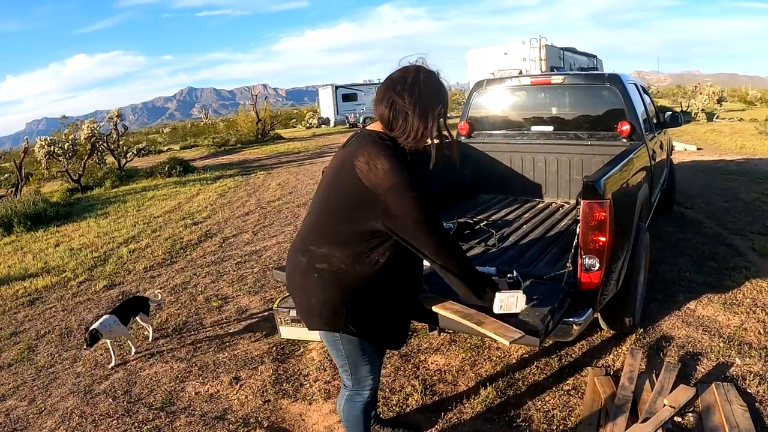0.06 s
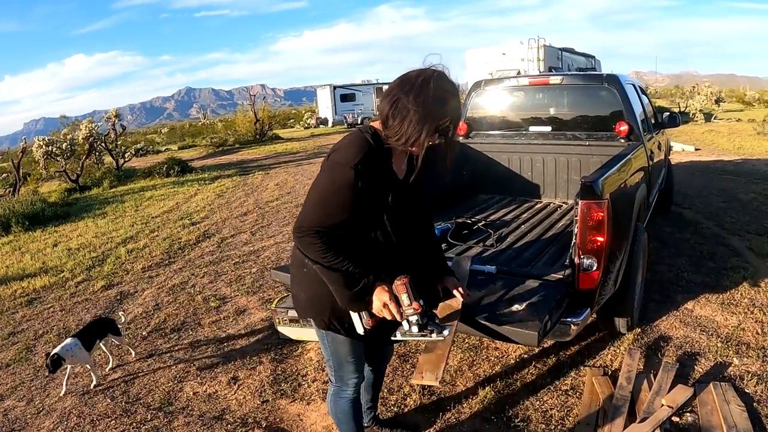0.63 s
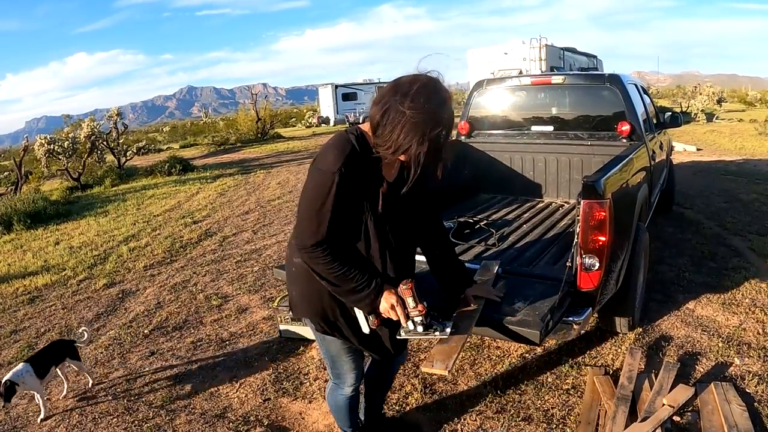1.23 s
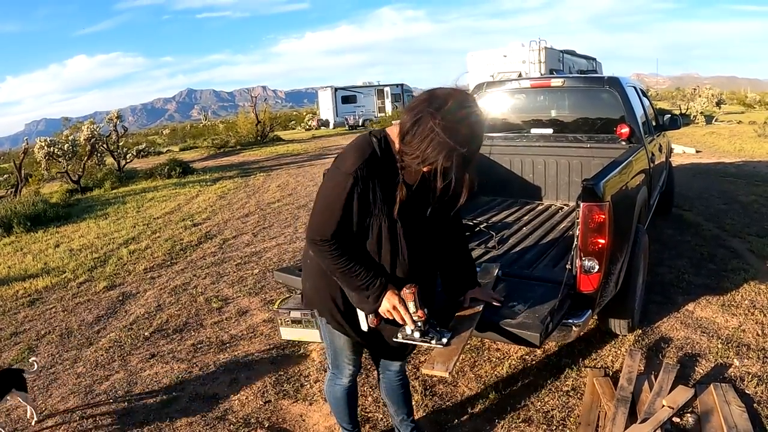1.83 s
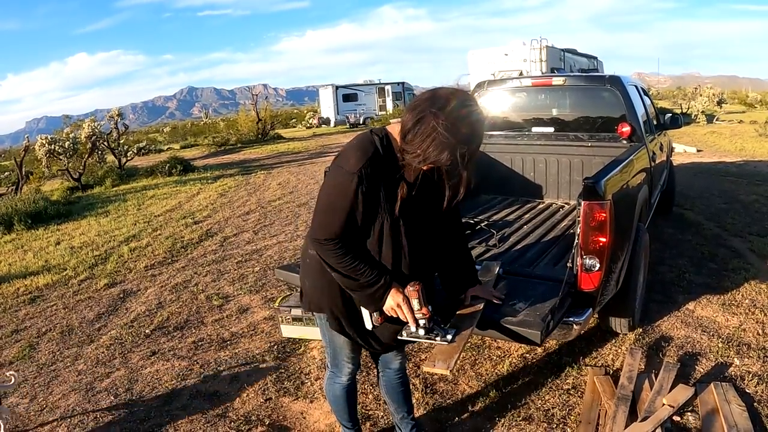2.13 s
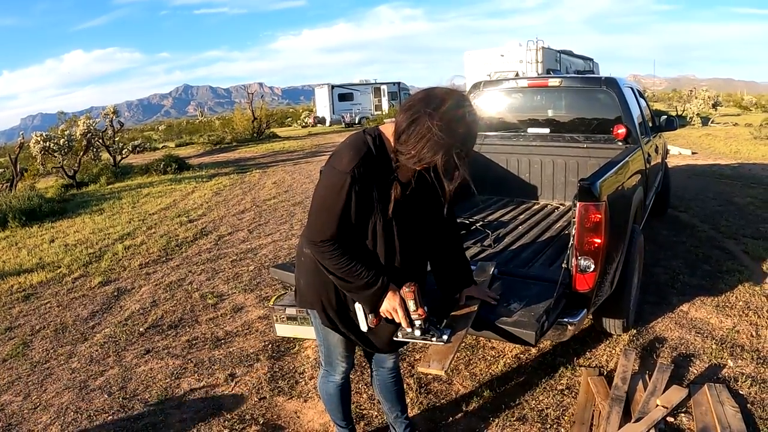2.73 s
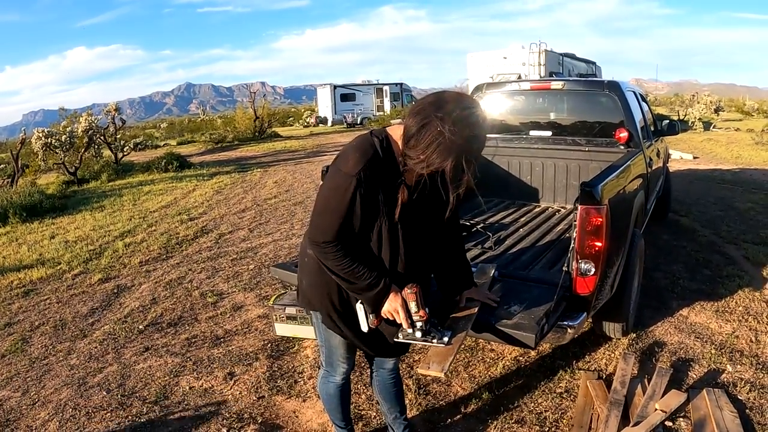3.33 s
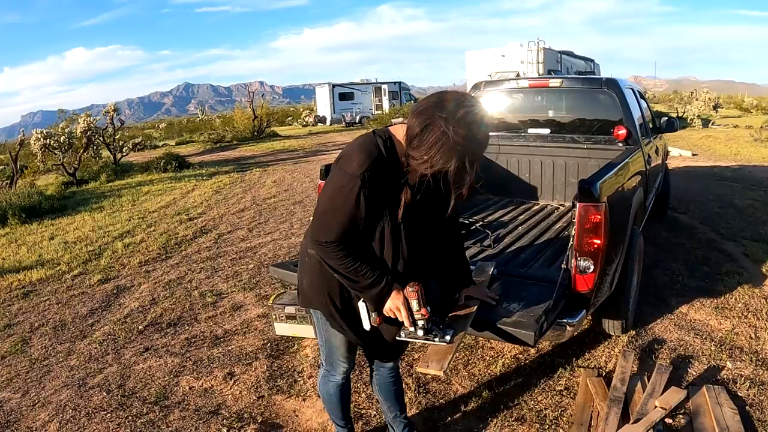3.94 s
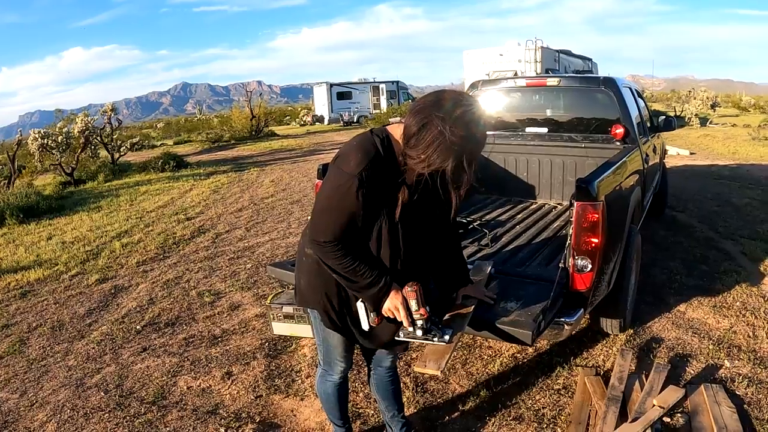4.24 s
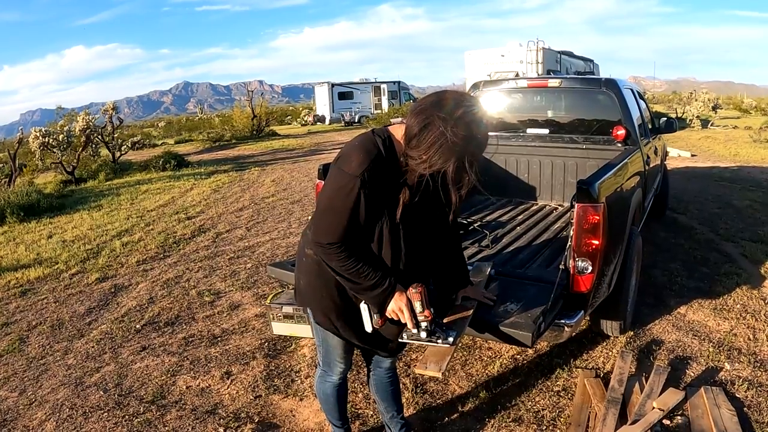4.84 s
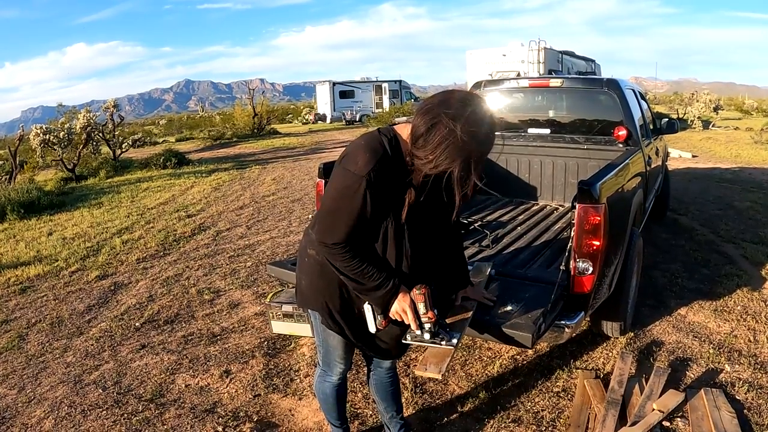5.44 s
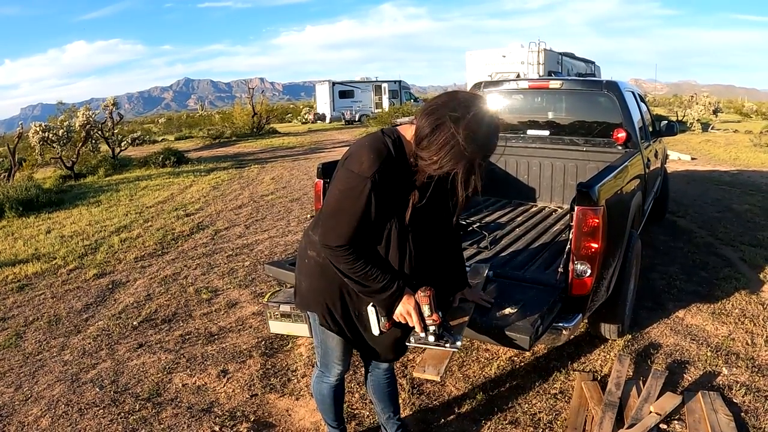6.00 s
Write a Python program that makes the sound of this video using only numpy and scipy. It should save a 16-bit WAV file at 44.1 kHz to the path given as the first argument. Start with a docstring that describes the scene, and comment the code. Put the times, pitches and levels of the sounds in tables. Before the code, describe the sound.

Over a faint low rush of outdoor air, a power saw is dragged off a pickup bed with light ticks, a dull scrape and soft bumps. From about 0.7 to 1.2 seconds the saw and a wooden board knock on the tailgate, with rustling and a brief ring from the steel blade. Another knock comes at 1.5 seconds, then a few small snaps and a lull. At about 3.1 seconds the trigger clicks and the reciprocating saw runs up over half a second, humming, with rattling gears and a few clacks. At about 4.1 seconds the blade bites into the board with short high squeaks. The motor gradually drops in pitch while a rapid, pulsing rasp and the board's low drone grow. The pinched blade squeals most around 5 to 5.3 seconds, and the cutting is still going at the end, about 6 seconds in.

```python
"""First come ticks, rustling and soft bumps as a power saw is dragged off a pickup's bed outdoors.
The saw and a wooden board knock on the tailgate, and the jarred steel blade rings.
The trigger clicks, the motor runs up with rattling gears, and the blade bites into the board.
Under load the motor slows, the drive knocks with every stroke, the teeth rasp through the wood,
the blade squeals where the cut pinches it, and the shaken board drones."""
import sys
import numpy as np
from scipy.fft import rfft, irfft, next_fast_len
from scipy.io import wavfile
from scipy.ndimage import uniform_filter1d, minimum_filter1d, map_coordinates

SR = 44100
rng = np.random.default_rng(int(sys.argv[2]) if len(sys.argv) > 2 else 0)


def store_pcm(level_fs):
    """Save levels as 16-bit WAV."""
    pcm = np.round(np.clip(level_fs, -1, 1) * 32767).astype(np.int16)
    wavfile.write(sys.argv[1], SR, np.atleast_2d(pcm).T)


N = 267687
TIME = np.arange(N) / SR

# Levels are relative. A mode is a pitch at which a thing rings; ring_s is its time to fade by 60 dB.
# Rush of open air: pitch_hz, level_db
AIR_SPECTRUM = [(20, -36), (30, -37), (48, -22), (66, -9.5), (80, -7.5), (100, -4.5), (155, -0.5),
                (200, -1), (256, 1), (340, -9), (420, -14), (665, -13), (1110, -6), (1850, -15.5),
                (3300, -36.5), (7000, -52), (12000, -87)]
# Sleeves and the saw's shoe (its metal foot) brush the board: start_s, length_s, level_db
BRUSHES = [(0, 0.0073, -34.5), (0.14, 0.55, -53.5), (0.76, 0.4, -31.5), (1.36, 0.18, -53.5),
           (1.637, 0.064, -43), (1.745, 0.25, -49), (2.85, 0.073, -52.5)]
# Rustle of that brushing: pitch_hz, level_db
RUSTLE_SPECTRUM = [(40, -13), (200, 3), (600, -2), (1200, -13), (2100, 0), (3000, -10), (3900, -6.5),
                   (6000, -21), (8900, -39), (11000, -28), (13000, -62)]
# Dull scrape on the truck bed's liner: pitch_hz, level_db
LINER_SPECTRUM = [(100, -16), (220, 0), (450, -15), (1200, 2), (1900, -3), (3000, -21), (8000, -56)]
# The teeth skid over metal: middle_s, length_s, level_db
SKIDS = [(0.838, 0.065, -37), (0.89, .06, -45), (1.05, .09, -46)]
# Bright sizzle of a skid: pitch_hz, level_db
SKID_SPECTRUM = [(3000, -40), (6300, 7), (8000, -14), (9600, -2), (12500, 0), (13500, -11)]
# Loose parts of the saw tick: start_s, level_db, pitch_hz
TICKS = [(.024, -24, 2060), (.062, -39, 2130), (.182, -26, 2080), (.223, -33, 2040), (.226, -49, 3830),
         (.342, -25, 2060), (.358, -35, 1550), (.479, -25, 1870), (.502, -23.5, 2090), (.545, -26, 2000),
         (.617, -32, 2000)]
# Grit under the shoe snaps, and the trigger clicks: start_s, level_db
SNAPS = [(1.229, -33.5), (1.241, -35), (1.528, -38), (1.659, -29), (1.745, -35), (1.868, -37), (2.863, -42),
         (2.919, -44), (3.082, -25)]
# Dry noise of a snap: pitch_hz, level_db
SNAP_SPECTRUM = [(500, -25), (2000, 8), (4200, 9), (7000, -12.5), (11000, -24), (13000, -28)]
# The hand-held board lands: start_s, level_db, pitch_hz
THUDS = [(.701, -10.5, 241.6), (0.735, -13, 175), (0.82, -16.5, 296), (1.025, -19.5, 302),
         (1.496, -23, 200.4)]
# Board and saw knock on the tailgate; the last knock is the trigger's click:
# start_s, level_db, rise_s, boom_db, brightness_db_per_octave
KNOCKS = [(0.68, -18, 0.00059, -9, 2.5), (0.696, -8, 0.00042, -16, 0), (0.702, -16, 0.0019, -6.5, 0),
          (.816, -11, 0.0043, -9.5, 12), (.857, -27, .0005, -5, 9), (.875, -13, 0.0011, -7, 2),
          (0.914, -26, 0.0041, 3, 25), (0.945, -9, 0.0048, -28, -6), (.957, -11.5, 0.0013, -9, -5),
          (1.018, -5.5, 0.011, -15.5, 3), (1.078, -19.5, 0.00052, -28, 0.5),
          (1.165, -21, 0.0032, -9.5, -19), (1.184, -19.5, 0.0087, -29, 7.5), (1.483, -15, 0.00041, -6, -2),
          (1.663, -29.5, 0.00035, -24, 2), (1.787, -30, 0.0042, -19, 0), (2.698, -44, 0.00036, -17, 7),
          (3.078, -21.5, 0.00074, -8.5, 3)]
# Dry clack of a knock: pitch_hz, level_db
KNOCK_SPECTRUM = [(180, -51), (300, -13), (692, -16), (1280, -7.5), (1430, 0.5), (1780, -8), (1990, 1),
                  (2640, -12), (4240, -20), (7730, -39.5), (9190, -67), (11100, -40), (13000, -58)]
# Boom of board and tailgate: pitch_hz, level_db, ring_s
TAILGATE_MODES = [(154, -0.5, 0.33), (196.5, 0.5, 0.39), (245, -3.5, 0.57), (301.3, 4, 0.27),
                  (330.4, 2.5, 0.24), (398, -6, 0.28), (557, -3.5, 0.32), (747, -6, 0.3), (954, -0.5, 0.22),
                  (1000, 7, 0.18), (1256, 1, 0.2), (1540, -9, 0.073), (1870, 8.5, 0.093)]
# The free steel blade: pitch_hz, level_db, ring_s
BLADE_MODES = [(1580, -9, 0.4), (1825, 1, 0.95), (2089, -4, 0.7), (2234, -3, .5), (2500, -1, 0.68),
               (2870, -2, 0.3), (3295, -8, 0.18), (3898, -9, .6), (4130, 2, 0.16), (5175, -7, 0.38),
               (6030, -16, .6), (6275, -4, 0.42), (6551, -12, .6), (7084, -18, 0.73), (7477, -11, 0.6),
               (8274, -25, 0.9), (9550, -10, 0.35), (10070, -15, 0.65), (10890, -10, 0.42),
               (11460, -8, 0.35), (11950, -14, 0.3), (12540, -10, 0.35), (13108, -14, 0.45)]
# The blade is jarred: start_s, level_db, boosted_pitch_hz, boost_db, share_of_ring_time, rise_s
BLADE_JARS = [(0, -42, 6030, 17, 0.4, 0.00067), (0.701, -43, 2130, 19, 0.76, 0.0014),
              (0.765, -35, 3295, 22, 0.62, 0.014), (0.787, -33, 5179, 3, 0.83, 0.0055),
              (.817, -30.5, 11200, 16, 1, 0.0012), (.875, -30.5, 1825, 9.5, 1, 0.0012),
              (0.968, -38, 5179, 20, 0.7, 0.0008), (0.974, -37, 7477, 14, 1, 0.0011),
              (1.021, -36, 6400, 9.5, 0.8, 0.0011)]
# Where the blade's ring sits in stereo: pitch_hz, left_minus_right_db
BLADE_PAN = [(7000, 0), (9500, 0.5), (12000, -6)]
# The saw's housing: pitch_hz, width_hz, level_db
HOUSING_MODES = [(791, 10.6, -8.5), (1326, 104, -20.5), (1652, 31, -2), (1976, 46, 5.5), (2195, 43, -10),
                 (2820, 30, -21)]
# The board or a jolt of the drive knocks the housing: start_s, level_db, boosted_pitch_hz
HOUSING_JOLTS = [(.68, -20, 1990), (1.483, -12, 2000), (1.487, -11.5, 1600), (3.081, -22, 1960),
                 (3.271, -11, 1640), (3.317, -12, 1990), (3.554, -10, 1633), (3.583, -17, 1950),
                 (4.174, -9, 1960), (4.307, -8, 1960), (4.371, -18, 1640), (4.532, -5.5, 2000),
                 (5.334, -7, 1950), (5.386, -8, 1970)]
# Resonances that boost the tone at three times the motor's speed: pitch_hz, width_hz, boost_db
THIRD_HARMONIC_PEAKS = [(936, 36, 14), (890, 13, 12)]
# Rattle of the gears: pitch_hz, level_db
GEAR_SPECTRUM = [(60, -29), (170, -18), (310, -4.5), (470, -16.5), (560, -6.5), (1000, -5.5), (1220, 2),
                 (2200, 3), (3150, -5), (4100, 0.5), (5250, -14), (5950, -11.5), (7350, -20), (8870, -49),
                 (11100, -19.5), (13400, -68)]
# The board shaken by the teeth: pitch_hz, width_hz, level_db
BOARD_MODES = [(195, 3.3, -2.5), (298.5, 13, 4)]
# The blade held in the cut: pitch_hz, width_hz, level_db
HELD_BLADE_MODES = [(3000, 93, 4), (5270, 90, -2), (6530, 130, -8)]
# The blade pinched by the cut: pitch_hz, width_hz, level_db
PINCHED_BLADE_MODES = [(2805, 140, 2), (4520, 230, 4.5), (5460, 190, 0), (6850, 250, -1)]
# The blade sticks and squeals: middle_s, length_s, pitch_hz, level_db
SQUEALS = [(4.135, .03, 3720, -20), (4.203, 0.022, 3590, -12.5), (4.228, .018, 6640, -27),
           (4.248, .01, 3720, -15), (4.357, .018, 3770, -16), (4.449, .018, 3710, -15),
           (4.517, .02, 3750, -16.5), (4.97, .14, 3870, -19), (5.04, .22, 2850, -27),
           (5.06, 0.13, 3730, -17.5), (5.05, 0.05, 4580, -24), (5.15, .28, 4540, -30),
           (5.213, 0.04, 3630, -13), (5.208, 0.046, 4590, -18.5), (5.268, 0.07, 4500, -20),
           (5.462, 0.03, 4420, -21), (5.828, .02, 3950, -17), (6.02, 0.04, 3944, -15)]
# Teeth tearing wood: pitch_hz, level_db
RASP_SPECTRUM = [(60, -60), (200, -43), (500, -40), (750, -14), (1500, -56), (2400, 0.5), (3200, -9.5),
                 (3900, 7), (4500, -4.5), (5050, -8.5), (5700, -14.5), (6900, -13.5), (8000, -30),
                 (9500, -29.5), (10900, -10), (12800, -22), (14000, -11)]
# How hard the blade is pressed into the board: time_s, load_0_to_1
LOAD = [(4.1, 0), (4.3, .12), (4.5, .27), (4.65, .5), (4.85, .7), (5.1, .78), (5.32, .9), (6.07, 1)]
# Echoes from board, tailgate and ground: delay_s, gain
ECHOES = [(.00109, 0.12), (.0030, 0.0064), (.00435, .14), (.0068, 0.11)]
# Stereo width of the saw: pitch_hz, side_db
SAW_WIDTH = [(80, -16), (300, -40), (650, -30.5), (2000, -60.5), (4000, -46.5), (7000, -31), (11000, -11)]
# Stereo width of the handling and the open air: pitch_hz, side_db
BACKGROUND_WIDTH = [(2500, -71), (4000, -39), (7000, -29), (11000, -8)]
# The microphone's treble response: pitch_hz, gain_db
MICROPHONE = [(8000, 0), (8750, -3), (9020, -14), (9250, -7), (10000, -2.5), (13000, -11.5), (13500, -18)]

TRIGGER_S, RUN_UP_S = 3.08, 0.55
FREE_HZ, SAG_HZ = 384, 96  # motor turns a second: running free, and lost at full load
GEAR_RATIO = 8.1  # motor turns for one back-and-forth cycle of the blade
BITE_S, BITE_RISE_S = 4.077, 0.064  # the teeth enter the wood
PINCH_S = 5.2  # the cut grips the blade hardest
STROKE_DB = 4  # how far the blade's song and squeals pulse with each cycle


def amp(db):
    """Turn decibels into a gain."""
    return 10 ** (np.asarray(db) / 20)


def unit(x):
    """Scale a signal to an average (rms) level of 1."""
    return x / np.sqrt(np.mean(x ** 2) + 1e-20)


def along(points, hz):
    """Read between (pitch, value) points on a log pitch axis."""
    pitches, values = np.transpose(points)
    return np.interp(np.log(hz + 1), np.log(pitches + 1), values)


def ramp(start_s, length_s):
    """Rise evenly from 0 to 1."""
    return np.clip((TIME - start_s) / length_s, 0, 1)


def bell(x, centre, width):
    """A smooth hump of height 1."""
    return np.exp(-(2 * (x - centre) / width) ** 2)


def wobble(per_s):
    """A smooth curve through per_s random values a second."""
    return map_coordinates(rng.standard_normal(int(N * per_s / SR) + 4), [TIME * per_s])


def grains(per_s, spread_db):
    """Tiny random impacts of uneven size."""
    size = amp(spread_db * np.clip(rng.standard_normal(N), -2, 2))
    return unit((rng.random(N) < per_s / SR) * rng.uniform(-0.64, 1, N) * size)


def filtered(x, response):
    """Give each frequency in x the gain that response returns for it."""
    size = x.shape[-1]
    padded = next_fast_len(size + SR // 4)
    return irfft(rfft(x, padded) * response(np.fft.rfftfreq(padded, 1 / SR)), padded)[..., :size]


def coloured(x, spectrum):
    """Shape x with a spectrum table, then scale it to level 1."""
    return unit(filtered(x, lambda hz: amp(along(spectrum, hz))))


def resonate(x, modes):
    """Let x shake (pitch, width, level) modes, then scale it to level 1."""
    def response(f):
        return sum(amp(db) * 1j * f * width / (hz * hz - f * f + 1j * f * width)
                   for hz, width, db in modes)
    return unit(filtered(x, response))


def phase_of(hz):
    """The running angle of a changing frequency."""
    return 2 * np.pi * np.cumsum(hz) / SR


def fuzzy_tone(hz, width_hz):
    """A mode kept ringing by random pushes: its strength and phase drift."""
    angle = phase_of(hz)
    return unit(wobble(width_hz) * np.sin(angle) + wobble(width_hz) * np.cos(angle))


def ring(modes, t):
    """Fading modes, struck at slightly new strengths each time."""
    hz, db, ring_s = np.transpose(modes)[:, :, None]
    fade = amp(db + 2 * rng.standard_normal(hz.shape) - 60 * t / ring_s)
    return np.sum(fade * np.sin(2 * np.pi * (hz * t + rng.random(hz.shape))), axis=0)


def boosted(modes, centre_hz, boost_db, reach_octaves=0.041):
    """The spot that is hit wakes the modes near one pitch most."""
    return [(hz, db + boost_db * np.exp(-(np.log2(hz / centre_hz) / reach_octaves) ** 2), ring_s)
            for hz, db, ring_s in modes]


def add(track, start_s, sound):
    """Mix a sound into the track."""
    part = track[max(round(start_s * SR), 0):][:len(sound)]
    part += sound[:len(part)]


def reflected(x):
    """Nearby surfaces add weak, delayed copies."""
    return filtered(x, lambda hz: 1 + sum(gain * np.exp(-2j * np.pi * hz * s) for s, gain in ECHOES))


def spread(mid, width):
    """Stereo for a source straight ahead: a weak scattered part differs between left and right."""
    side = filtered(mid * wobble(160), lambda hz: amp(along(width, hz)))
    return np.array([mid + side, mid - side])


def open_air():
    """A low outdoor rush that sways very slightly."""
    return amp(-36.5 + 0.6 * wobble(7)) * coloured(rng.standard_normal(N), AIR_SPECTRUM)


def brushing(rise_s=0.0038, fade_db_per_s=195):
    """Sleeves and the saw's shoe rub the board: each stroke rises, holds and fades."""
    strokes = sum(ramp(s, rise_s) * amp(db - fade_db_per_s * np.maximum(TIME - s - length_s, 0))
                  for s, length_s, db in BRUSHES)
    friction = rng.standard_normal(N) + 0.3 * grains(per_s=160, spread_db=2.5)
    return strokes * coloured(friction, RUSTLE_SPECTRUM)


def scrapes():
    """The saw slides dully over the bed liner; its teeth skid brightly over metal."""
    slide = coloured(grains(per_s=1300, spread_db=3.5), LINER_SPECTRUM)
    sizzle = coloured(grains(per_s=3700, spread_db=5), SKID_SPECTRUM)
    skids = sum(amp(db) * bell(TIME, s, length_s) for s, length_s, db in SKIDS)
    return amp(-38) * bell(TIME, 0.48, 0.55) * slide + skids * sizzle


def ticks_and_snaps(tick_ring_s=0.035, tick_rise_s=0.0024, snap_ring_s=0.013):
    """Loose parts tick with one short note each; grit and the trigger snap dryly."""
    out, t = np.zeros(N), np.arange(SR // 10) / SR
    for s, db, hz in TICKS:
        noise = coloured(rng.standard_normal(len(t)), SNAP_SPECTRUM)
        note = np.sin(2 * np.pi * hz * t) + amp(-15) * noise
        add(out, s, amp(db - 60 * t / tick_ring_s) * (1 - np.exp(-t / tick_rise_s)) * note)
    for s, db in SNAPS:
        noise = coloured(rng.standard_normal(len(t)), SNAP_SPECTRUM)
        add(out, s, amp(db - 60 * t / snap_ring_s) * noise)
    return out


def board_thuds(rise_s=0.013, ring_s=0.19):
    """Grip and support change with each landing, so each thud has its own low pitch."""
    out, t = np.zeros(N), np.arange(SR // 4) / SR
    for s, db, hz in THUDS:
        add(out, s, amp(db - 60 * t / ring_s) * (1 - np.exp(-t / rise_s)) * np.sin(2 * np.pi * hz * t))
    return out


def drag_bumps(count=6, span_s=(0.17, 0.55), rise_s=0.024, boom_db=-5.5, brightness=-7):
    """The dragged saw bumps softly at loosely even times; gives rows like those of KNOCKS."""
    chance = rng.random((count, 2))
    times = np.interp((np.arange(count) + chance[:, 0]) / count, [0, 1], span_s)
    levels_db = -24.5 - 5 * (2 * chance[:, 1] - 1)
    return [(s, db, rise_s, boom_db, brightness) for s, db in zip(times, levels_db)]


def knocks(clack_ring_s=0.083, detune=0.075):
    """Each knock, and the trigger's click, is a dry clack and a boom that shifts as the weight moves."""
    out, t = np.zeros(N), np.arange(SR // 2) / SR
    for s, db, rise_s, boom_db, brightness in KNOCKS + drag_bumps():
        def colour(hz):
            octaves = np.clip(np.log2((hz + 1) / 2000), -1, 1.5)
            return amp(along(KNOCK_SPECTRUM, hz) + brightness * octaves)
        clack = unit(filtered(rng.standard_normal(len(t)), colour)) * amp(-60 * t / clack_ring_s)
        modes = [(hz * np.exp(detune * rng.standard_normal()), mode_db, ring_s)
                 for hz, mode_db, ring_s in TAILGATE_MODES]
        boom = amp(boom_db - 5.5) * ring(modes, t) * (1 - np.exp(-t / 0.019))
        add(out, s, amp(db) * (clack + boom) * (1 - np.exp(-t / rise_s)))
    return out


def blade_ring(flutter_per_s=110, settle_s=1.126, settle_db_per_s=252):
    """The jarred steel rings; it is loose in its clamp, so each mode flutters on its own."""
    out, t = np.zeros(N), np.arange(SR // 2) / SR
    for s, db, centre_hz, boost_db, share, rise_s in BLADE_JARS:
        for hz, mode_db, ring_s in boosted(BLADE_MODES, centre_hz, boost_db):
            flutter_db = 3 * np.interp(t * flutter_per_s, np.arange(len(t)), rng.standard_normal(len(t)))
            note = ring([(hz, mode_db, share * ring_s)], t)
            add(out, s, amp(db + flutter_db) * note * (1 - np.exp(-t / rise_s)))
    # the shoe settles on the board and stops the ring
    return out * amp(-settle_db_per_s * np.maximum(TIME - settle_s, 0))


def housing_clacks():
    """Single hard jolts ring the saw's housing."""
    out, t = np.zeros(N), np.arange(SR // 8) / SR
    # the narrower a mode, the longer it rings
    modes = [(hz, db, np.log(1000) / (np.pi * width)) for hz, width, db in HOUSING_MODES]
    for s, db, hz in HOUSING_JOLTS:
        clack = ring(boosted(modes, hz, boost_db=12), t) * (1 - np.exp(-t / 0.0024))
        add(out, s, amp(db - 3) * clack / np.abs(clack).max())
    return out


def speed_db(speed_hz, db_per_tenfold):
    """A slower motor is quieter: the level compared with running free."""
    return db_per_tenfold * np.log10(np.maximum(speed_hz / FREE_HZ, 0.1))


def motor_hum(shaft, speed_hz, load):
    """The rotor hums at its turning speed and at three times that, and runs rough as it speeds up."""
    growth_db = speed_db(speed_hz, db_per_tenfold=29)
    swell_db = 7 * bell(TIME, 3.95, 0.4)  # just before the teeth bite
    peaks_db = sum(db * bell(3 * speed_hz, hz, width) for hz, width, db in THIRD_HARMONIC_PEAKS)
    third = np.sin(3 * shaft + 0.25 * wobble(60))
    hum_db = -32.5 + growth_db - 11 * load + swell_db + 1.2 * wobble(35)
    hum = amp(hum_db) * np.sin(shaft + 0.14 * wobble(50))
    hum += amp(-43 + growth_db + peaks_db + 2.2 * wobble(30)) * third
    shudder = amp(-29) * bell(TIME, 3.48, 0.31) * fuzzy_tone(speed_hz, width_hz=61)
    return np.sqrt(2) * hum + shudder


def gear_rattle(shaft, speed_hz, load, wear_points=1100):
    """Gear teeth rattle in the housing, throbbing once a motor turn and juddering unevenly."""
    throb = amp(1.6 * np.sin(shaft) + wobble(80))
    hiss = rng.standard_normal(N)
    # uneven tooth faces: the same rough pattern comes round with every blade cycle
    position = shaft / GEAR_RATIO / (2 * np.pi) % 1
    wear = unit(np.interp(position, np.arange(wear_points) / wear_points,
                          rng.standard_normal(wear_points)))
    impacts = grains(per_s=2500, spread_db=3)
    rattle = coloured(throb * (hiss + 0.35 * wear + 0.74 * impacts), GEAR_SPECTRUM)
    housing = resonate(throb * grains(per_s=3000, spread_db=1.5), HOUSING_MODES)
    level_db = -16 + speed_db(speed_hz, db_per_tenfold=15) - 0.6 * load
    return amp(level_db) * (amp(-2.5) * rattle + amp(-6.5) * housing)


def drive_knocks(cycle, load, return_db=-5):
    """The drive knocks the housing each time the blade turns back, more softly on the return stroke."""
    stroke = np.floor(cycle / np.pi)
    hits = np.diff(stroke, prepend=0) * amp(return_db * (stroke % 2) + 3 * wobble(60))
    running_share = np.mean(TIME > TRIGGER_S)
    knocking = resonate(hits, HOUSING_MODES) * np.sqrt(running_share)  # level 1 while the saw runs
    level_db = -28.5 + 6 * ramp(BITE_S, BITE_RISE_S) - 3 * load
    return amp(level_db) * ramp(TRIGGER_S, RUN_UP_S) * knocking


def board_drone(cycle, load, bursts):
    """The teeth shake the board: it rumbles, and two harmonics of the blade cycle near its modes hum."""
    sixth = amp(5.5 + 2.8 * wobble(8.8)) * np.sin(6 * cycle)
    ninth = amp(0.5 + 0.88 * wobble(26)) * np.sin(9 * cycle)
    rumble = amp(4.5) * resonate(bursts * rng.standard_normal(N), BOARD_MODES)
    return amp(-53 + 17 * load) * (sixth + ninth + rumble)


def blade_song(cycle, load, bursts):
    """The blade sings in the cut, its side screeches thinly, and it rings out when pinched."""
    damping_db = -28 * ramp(start_s=5.3, length_s=0.25)  # deeper in, the wood damps the blade
    tone = unit(amp(STROKE_DB * np.sin(cycle))) * fuzzy_tone(3630 + 203.5 * load, width_hz=190)
    held = resonate(bursts * rng.standard_normal(N), HELD_BLADE_MODES)
    song = amp(-26.5 + 4.5 * load + damping_db) * (tone + amp(-11.5) * held)
    screech = amp(-45 + 10.5 * load + damping_db) * fuzzy_tone(np.full(N, 6635), width_hz=90)
    pinched = resonate(bursts * rng.standard_normal(N), PINCHED_BLADE_MODES)
    pinched = resonate(pinched, PINCHED_BLADE_MODES)  # a second pass sharpens the peaks
    return song + screech + amp(-24.5) * bell(TIME, PINCH_S, 0.34) * pinched


def blade_squeals(cycle, waver_hz=48):
    """Where the blade sticks, one mode swells into a brief squeal that pulses with the strokes."""
    out, pulse_db = np.zeros(N), STROKE_DB * np.sin(cycle)
    for s, length_s, hz, db in SQUEALS:
        swell = amp(db + pulse_db + 1.5 * wobble(130)) * bell(TIME, s, length_s)
        out += swell * np.sin(phase_of(hz + waver_hz * wobble(200)))
    return out


def cutting(cycle, load):
    """The teeth tear wood in bursts tied to the strokes; blade and board join in, louder under load."""
    bursts = unit(amp(np.sin(cycle) + 1.7 * np.sin(2 * cycle) + np.sin(3 * cycle) + 1.45 * wobble(45)))
    tearing = bursts * (rng.standard_normal(N) + grains(per_s=3000, spread_db=0))
    rasp_db = -29.5 + 13 * load + 1.5 * bell(TIME, PINCH_S, 0.2)
    rasp = amp(rasp_db) * coloured(tearing, RASP_SPECTRUM)
    ringing = blade_song(cycle, load, bursts) + board_drone(cycle, load, bursts)
    return ramp(BITE_S, BITE_RISE_S) * (rasp + ringing)


def scene():
    """Mix handling, air and the saw, whose one shaft eases up to speed and slows under load."""
    load = np.interp(TIME, *np.transpose(LOAD))
    speed_hz = FREE_HZ * (1 - (1 - ramp(TRIGGER_S, RUN_UP_S)) ** 2) - SAG_HZ * load
    shaft = phase_of(speed_hz * (1 + 0.0087 * wobble(22)))  # the motor's angle
    cycle = shaft / GEAR_RATIO  # the angle of the blade's drive
    clacks = housing_clacks()
    motor = motor_hum(shaft, speed_hz, load) + gear_rattle(shaft, speed_hz, load)
    running = motor + drive_knocks(cycle, load) + cutting(cycle, load) + blade_squeals(cycle)
    saw = clacks + running * (TIME > TRIGGER_S)
    impacts = reflected(knocks() + board_thuds())
    background = impacts + ticks_and_snaps() + scrapes() + brushing() + open_air()
    steel = filtered(blade_ring(), lambda hz: amp(np.outer([0.5, -0.5], along(BLADE_PAN, hz))))
    return spread(reflected(saw), SAW_WIDTH) + spread(background, BACKGROUND_WIDTH) + steel


def record(dry, ceiling=0.78, top_hz=13700):
    """A limiter turns down the highest peaks; the microphone notches the treble and cuts off its top."""
    needed_gain = np.minimum(1, ceiling / (np.abs(dry).max(axis=0) + 1e-9))
    smooth_gain = uniform_filter1d(minimum_filter1d(needed_gain, size=181), size=181)
    return filtered(dry * smooth_gain, lambda hz: amp(along(MICROPHONE, hz)) * (hz < top_hz))


dry = scene()
out = record(dry)
store_pcm(out)
```